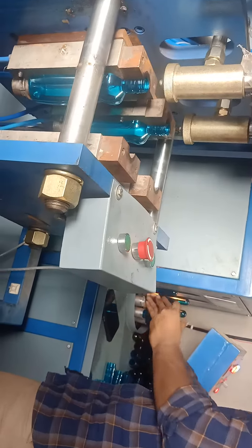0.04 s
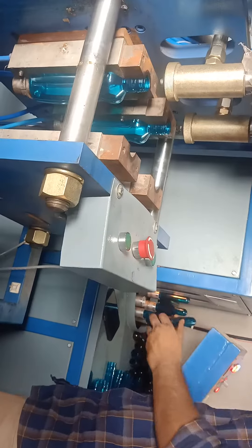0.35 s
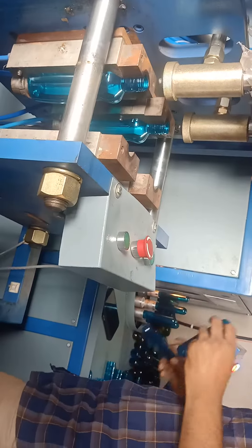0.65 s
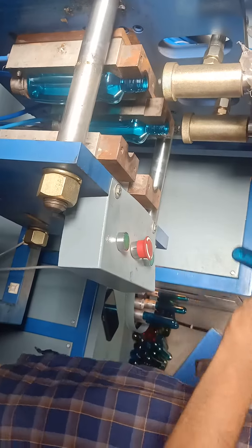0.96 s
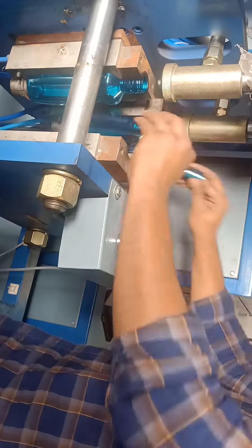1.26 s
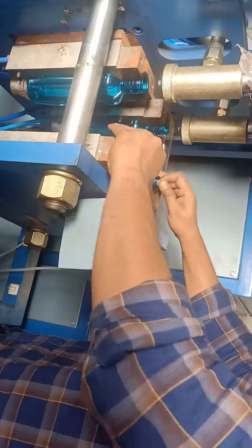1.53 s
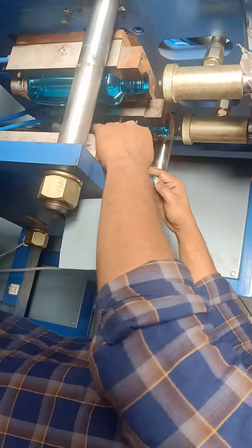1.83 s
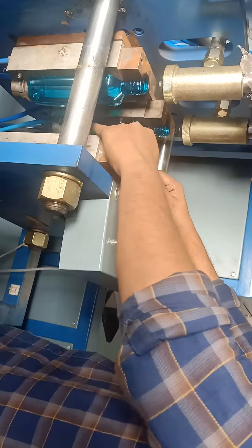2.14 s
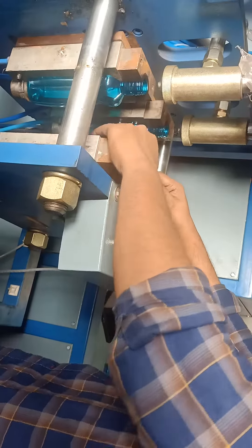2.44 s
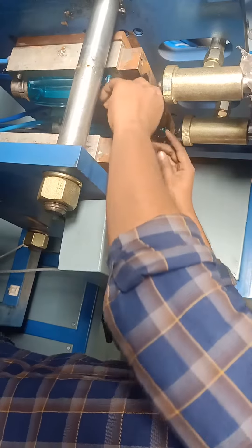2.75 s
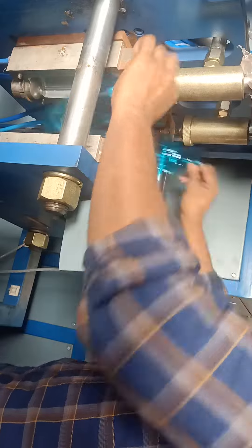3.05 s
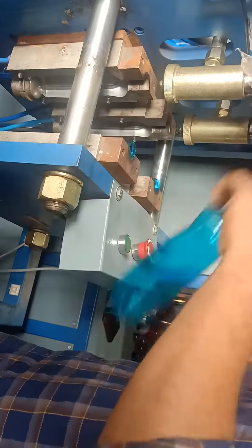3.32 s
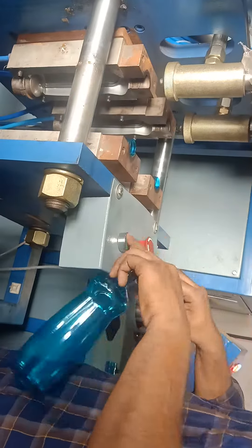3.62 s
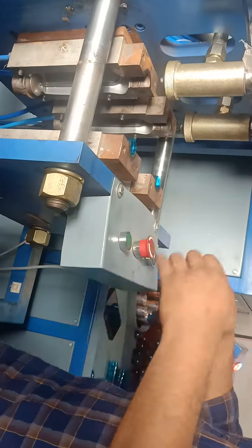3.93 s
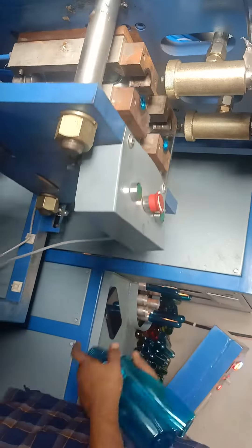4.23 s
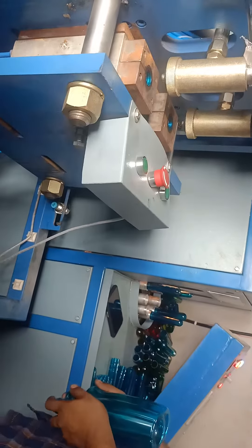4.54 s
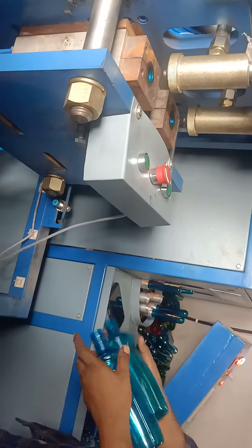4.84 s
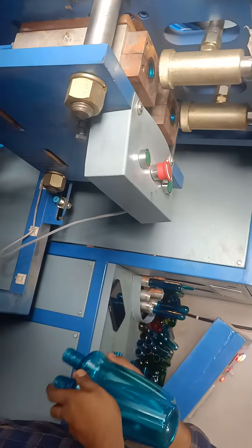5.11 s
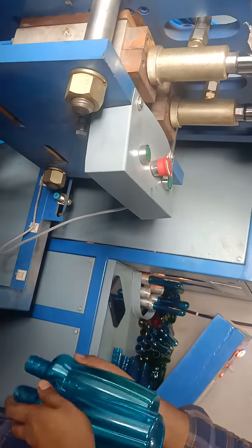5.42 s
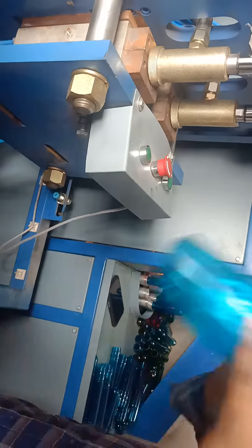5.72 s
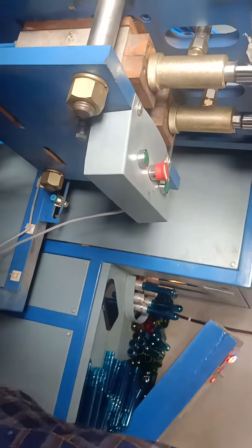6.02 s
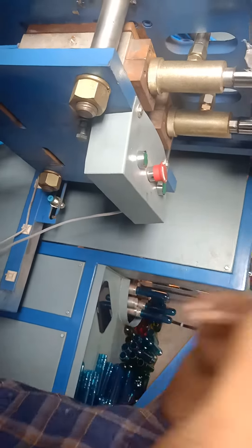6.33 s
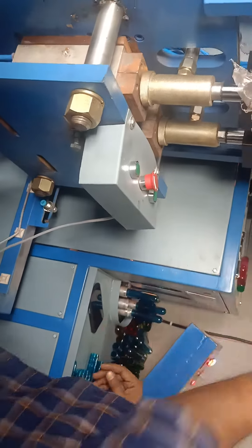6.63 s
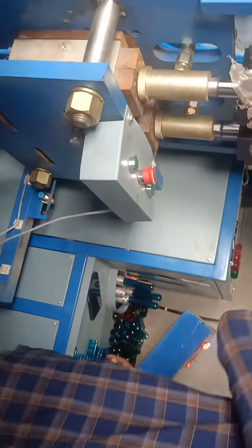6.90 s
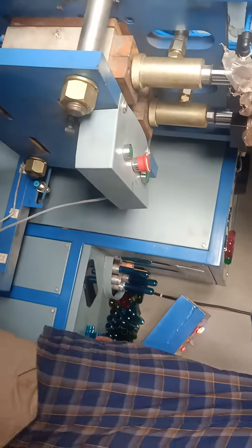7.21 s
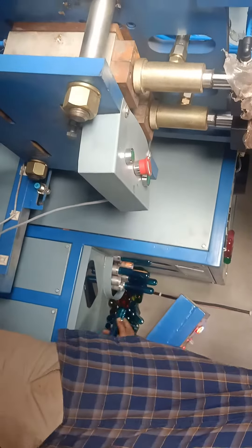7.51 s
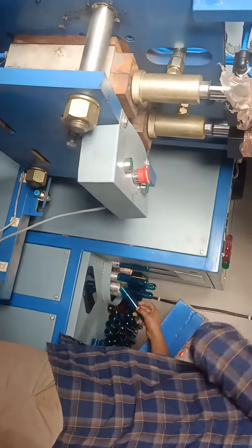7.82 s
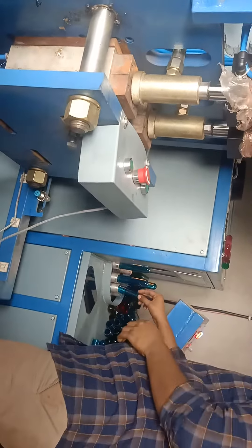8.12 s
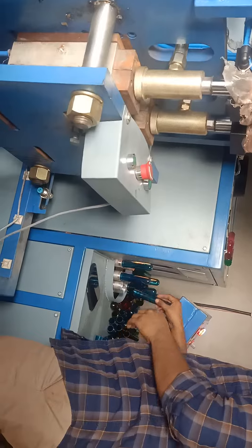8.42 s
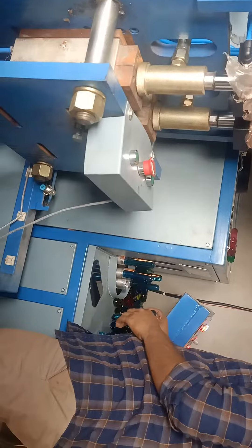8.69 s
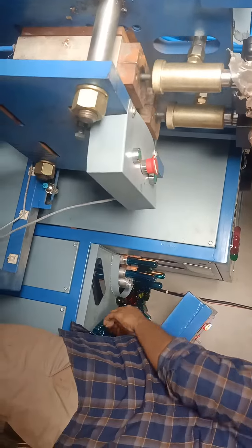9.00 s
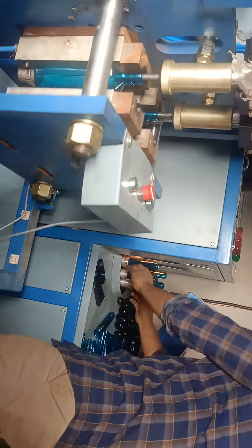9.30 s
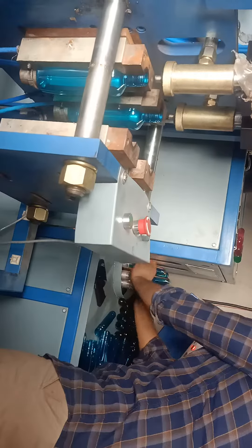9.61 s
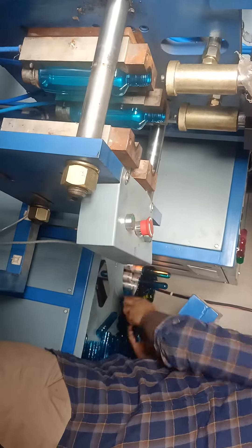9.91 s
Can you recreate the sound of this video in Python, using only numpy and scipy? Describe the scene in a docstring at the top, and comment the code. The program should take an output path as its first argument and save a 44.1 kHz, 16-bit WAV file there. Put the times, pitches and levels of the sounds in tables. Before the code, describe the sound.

Over droning, whining motors, a bottle moulding machine lets out two sharp air blasts, with hissing vents and metal clunks.

```python
"""A small workshop, just above the mould of a pneumatic bottle blow-moulding machine running one cycle.
Motors drone and whine as a bed. Valves dump compressed air through a ringing silencer, with a shriek,
a cabinet boom and gusts on the microphone. Cylinders vent as the mould travels, seals spit, and steel
parts clunk home. An automatic gain ducks under the bright hisses and creeps back up."""
import sys
import numpy as np
from scipy import signal
from scipy.fft import rfft, irfft
from scipy.io import wavfile
from scipy.ndimage import uniform_filter1d

SR = 44100
rng = np.random.default_rng(int(sys.argv[2]) if len(sys.argv) > 2 else 0)


def dump_mix(stems):
    """Bounce the given channels to the path in sys.argv[1] as a 16-bit WAV at rate SR."""
    frames = np.atleast_2d(stems).T  # one column per channel
    limited = np.clip(frames, -1, 1)  # hard clip at full scale
    pcm = np.round(limited * 32767).astype(np.int16)
    wavfile.write(sys.argv[1], SR, pcm)


N = 438794
T = np.arange(N) / SR
F = np.maximum(np.fft.rfftfreq(N, 1 / SR), 1)

# Each EQ shapes a noise; its levels are relative. Sag is the fall in level while a valve stays open.
# workshop drone (f/Hz, level/dB)
DRONE_EQ = [(25, -26), (55, -27), (80, -13), (112, -7.5), (160, -7), (260, -5.5), (420, 0.5), (750, -2),
            (1100, -4.5), (2080, -5.5), (3280, -11), (5170, -12.5), (8800, -38), (13500, -36.5),
            (15500, -44)]
# broad resonances and dips in the drone (f/Hz, width/Hz, gain/dB)
DRONE_RINGS = [(1500, 82, -5), (1825, 41, 1), (2100, 91, 5.5), (2360, 430, 4.5), (3280, 210, -8.5),
               (4220, 170, 4), (5400, 180, 6), (5440, 720, -6)]
# motor hum (multiple of the motor's speed, level/dB)
MOTOR_HARMONICS = [(2, -56), (3, -50), (4, -56.5), (5, -50.5), (7, -52.5), (10, -53)]
# steady tones of fans and pumps (f/Hz, level/dB)
FAN_TONES = [(117, -53), (433, -47.5), (1695, -55), (1838, -48), (1900, -53), (2047, -47), (2335, -73),
             (2472, -50.5), (4258, -64), (5066, -63)]
# whining motors (f/Hz, level/dB, load on/s, load off/s, load boost/dB, left-right phase/rad)
MOTOR_WHINES = [(1208, -45, 1.67, 4.3, 6, -2), (2060, -54, 1.73, 3.8, 9, 0.71),
                (1343, -51, 4.6, 12, 8, -1.7)]
# fine spray of air past the seals (f/Hz, level/dB)
SPRAY_EQ = [(200, -60), (3000, -7), (5000, 21.5), (7500, 9.5), (9500, -2.5), (12000, 10), (14000, 2),
            (15500, -10)]
# seal spits (t/s, level/dB, attack/s, t60/s)
SEAL_SPITS = [(2.325, -44, 0.0087, .15), (4.115, -46, 0.0077, .25), (4.485, -27, 0.004, 0.29),
              (4.553, -24.5, .003, 0.39), (4.62, -32, .012, 0.5), (4.77, -37, 0.021, 0.18),
              (6.025, -31.5, 0.06, 0.22), (9.607, -27.5, 0.008, 0.83), (9.743, -33, 0.007, .35),
              (9.815, -34, 0.009, 0.26)]
# leak while the bottles are under pressure (t/s, level/dB, attack/s, hold/s, sag/(dB/s), t60/s)
SEAL_LEAK = [(6.0, -52.5, 0.69, 1.8, 0.5, .1)]
# rattling body of the steel frame (f/Hz, level/dB)
FRAME_EQ = [(25, -40), (70, -14), (130, -5.5), (260, 4.5), (500, 5.5), (1000, -3), (1450, -4), (2200, 2.5),
            (3300, -9), (5000, -7.5), (7500, -20), (14000, -36)]
# broad clang of the mould plates (f/Hz, width/Hz, gain/dB)
PLATE_CLANG = [(2560, 330, 10.5), (920, 150, 9), (344, 100, 0)]
# ringing modes of the frame (f/Hz, relative level/dB, t60/s)
STEEL_MODES = [(187, -30, 0.25), (327, -10, 0.16), (475, -8, .25), (804, -24, 0.11), (926, -1, 0.41),
               (1110, -19, 0.14), (1360, -9, .09), (2160, -6, .35), (2170, -16, .2), (2636, 12, 0.35),
               (2900, -11, .35)]
# hits on the frame (t/s, level/dB, attack/s, t60/s, low-pass/Hz)
FRAME_HITS = [(3.025, -28.5, 0.0043, 0.17, 8000), (3.107, -26, 0.0067, 0.04, 5000),
              (4.426, -13, 0.0036, 0.12, 3000), (4.449, -17.5, 0.0088, 0.83, 400),
              (4.57, -31, 0.016, 0.57, 400), (6.533, -18.5, 0.0046, 0.41, 2370),
              (9.523, -12, 0.007, 0.29, 4020), (9.579, -26.5, 0.011, 0.92, 1000),
              (9.745, -33.5, .005, 1, 1180)]
# dump valve's port (f/Hz, level/dB)
DUMP_EQ = [(25, -50), (70, -12), (200, -7.5), (600, -7), (1400, -4.5), (1900, -3.5), (2550, -3),
           (3300, -4.5), (4200, -8), (5800, -6), (7500, -24), (10000, -28), (13500, -27), (15500, -43)]
# silencer that dumps and cylinder vents both blow through (f/Hz, width/Hz, gain/dB)
SILENCER_RINGS = [(2470, 410, 5.5), (1660, 19, -7), (2060, 17, 6.5), (2294, 20, 9.5), (2680, 30, 0),
                  (2880, 37, 6), (3930, 65, 8.5), (4180, 60, 4.5), (6000, 37, 9)]
# valve dumps (t/s, level/dB, attack/s, shriek level/dB)
VALVE_DUMPS = [(3.795, 4.5, 0.028, -1), (8.082, -4, 0.0072, 1.5)]
# thin air jet (f/Hz, level/dB)
JET_EQ = [(60, -60), (900, -7.5), (1900, -2), (2600, 7.5), (3400, -1), (5100, 4), (6300, -2), (8000, -13),
          (10500, -14.5), (14000, -14.5), (15500, -9.5)]
# valves letting out a jet (t/s, level/dB, attack/s, hold/s, sag/(dB/s), t60/s)
JET_CUES = [(5.048, -18, 0.043, 0.62, 11, 1.86), (8.008, -29.5, 0.0092, 0.042, 0, 0.58),
            (8.72, -29, .015, 1, 8, .8), (8.76, -17, 0.078, 0.21, 26, 0.64),
            (8.85, -13.5, 0.073, 0.013, 0, 0.56)]
# cabinet boom (f/Hz, level/dB)
CABINET_EQ = [(25, -32), (55, -24), (90, 7), (115, -8.5), (150, 6.5), (260, -16), (600, -17.5), (3000, -56)]
# thuds of pressure through the cabinet (t/s, level/dB, attack/s, t60/s)
CABINET_THUDS = [(3.802, -10, 0.0085, 0.29), (5.308, -29.5, 0.013, 0.29), (8.09, -20, 0.027, 0.22),
                 (8.88, -39, 0.027, 0.18), (9.525, -34, 0.009, .5)]
# rumble of exhaust air on the microphone (f/Hz, level/dB)
GUST_EQ = [(25, -38), (55, -11), (100, 3.5), (190, 5), (350, 3), (700, -2.5), (1500, -11.5), (4000, -25),
           (12000, -60)]
# gusts of that air (t/s, level/dB)
GUST_CUES = [(3.803, 1), (3.824, 0), (3.844, -14), (8.086, -12), (8.103, -1.5), (8.118, -7), (8.155, -10),
             (8.902, -8.5), (8.918, -11.5), (8.938, -14.5), (8.949, -11.5)]
# cylinder vents (f/Hz, level/dB)
VENT_EQ = [(25, -60), (150, -17), (600, -6.5), (1400, -7), (2000, -4), (2550, 1), (3300, -3), (4200, -5),
           (5700, -6.5), (7500, -25), (10000, -29), (13000, -28), (15500, -41)]
# piston strokes (t/s, level/dB, attack/s, travel/s, sag/(dB/s))
PISTON_STROKES = [(3.92, -11.5, 0.15, 0.56, 15.5), (4.72, -31.5, 0.095, 0.094, 10),
                  (8.75, -20.5, 0.026, 0.35, 10), (8.85, -15.5, 0.055, 0.12, 18),
                  (9.198, -30, 0.14, 0.56, -3), (9.59, -33, 0.019, .03, 19.5),
                  (9.742, -35, 0.014, 0.11, 12)]
# stereo tilt of the microphone pair (f/Hz, left minus right/dB)
MIC_BALANCE = [(60, 0), (110, -1), (200, 0), (380, 0.5), (700, -3), (1280, 2), (2370, -7), (4370, -2),
               (8070, 0.5), (14900, -7)]


def undb(db):
    """Decibels to gain."""
    return 10 ** (np.asarray(db) / 20)


def eq_curve(points):
    """Join EQ points on a log-frequency axis, in dB."""
    hz, db = np.transpose(points)
    return np.interp(np.log(F), np.log(hz), db)


def wander(rate_hz):
    """Smooth random modulation with a spread near 1."""
    knots = rng.standard_normal(4096)
    return 1.297 * np.interp(T * rate_hz, np.arange(len(knots)), knots)


def flow(start, db, attack, hold, sag_db_per_s, t60):
    """Valve envelope: it opens, sags with the pressure while held, then drains away."""
    age = np.maximum(T - start - attack, 0)
    fall_db = sag_db_per_s * np.minimum(age, hold) + 60 * np.maximum(age - hold, 0) / t60
    return np.clip((T - start) / attack, 0, 1) * undb(db - fall_db)


def flows(cues):
    """Envelope of several openings feeding one outlet."""
    return sum(flow(*cue) for cue in cues)


def bursts(cues):
    """Envelope of openings with no hold: pressure builds and drains away at once."""
    return sum(flow(start, db, attack, 0, 0, t60) for start, db, attack, t60 in cues)


def air(eq, rings=(), lag_ms=0, plates=0.5, diffuse=0.5):
    """Coloured stereo turbulence at rms 1: direct, scattered off steel plates, and diffuse from the room."""
    t = T[:2048]
    scatter = rng.standard_normal((2, len(t))) * np.exp(-t / 0.046) * (t > 0.001)
    scatter = rfft(scatter / np.sqrt(np.sum(scatter ** 2, axis=1, keepdims=True)), N)
    direct = np.exp(-1j * np.pi * F * lag_ms / 1000 * np.array([[1], [-1]]))
    spread = (F + 60) / (F + 400)  # long waves reach both sides alike
    source, *room = rfft(rng.standard_normal((3, N)))
    field = source * (direct + plates * spread * scatter) + diffuse * spread * np.array(room)
    rings_db = sum(db / (1 + (2 * (F - hz) / width) ** 2) for hz, width, db in rings)
    noise = irfft(undb(eq_curve(eq) + rings_db) * field, N)
    return noise / np.sqrt(np.mean(noise ** 2))


def motor_tone(hz, stereo_rad, drift_hz, flutter_db):
    """A motor tone that drifts in pitch and flutters in level on each side."""
    phase = 2 * np.pi * np.cumsum(hz + drift_hz * wander(12)) / SR
    sides = [np.sin(phase + shift) * undb(flutter_db * wander(9.8)) for shift in (stereo_rad, 0)]
    return np.sqrt(2) * np.array(sides)


def workshop_bed(motor_hz=66.6):
    """Motors and fans: a restless drone, a many-toned hum, and whines that swell under load."""
    bed = air(DRONE_EQ, DRONE_RINGS, lag_ms=0.345, plates=0.9, diffuse=0.76)
    bed *= undb(-32 + 0.11 * wander(16))
    for hz, db in [(order * motor_hz, db) for order, db in MOTOR_HARMONICS] + FAN_TONES:
        bed += undb(db) * motor_tone(hz, min(hz / 1500, 0.8), drift_hz=1 + hz / 600, flutter_db=0.5)
    for hz, db, start, end, boost_db, stereo_rad in MOTOR_WHINES:
        load = np.clip(np.minimum(T - start, end - T) / 0.032, 0, 1)
        whine = motor_tone(hz, stereo_rad, drift_hz=1.51, flutter_db=2)
        bed += undb(db + boost_db * load) * whine * undb([[-3], [3]])  # panned right
    return bed


def seal_spray():
    """Air squeezes past the seals in fizzy spits and one long, faint leak."""
    spray = air(SPRAY_EQ, plates=1, diffuse=0.21)
    return spray * (bursts(SEAL_SPITS) + flows(SEAL_LEAK)) * undb(0.99 * wander(86))


def frame_clunks(room_t60=3.54):
    """Hits on the steel frame: a dense rattle, ringing modes and a room tail, duller for soft contacts."""
    rattle = air(FRAME_EQ, PLATE_CLANG, plates=0.2, diffuse=0.76) * undb(wander(220))
    clunks = np.zeros((2, N))
    for at, db, attack, t60, lowpass_hz in FRAME_HITS:
        start = int(at * SR)
        t = T[:min(SR, N - start)]
        span = slice(start, start + len(t))
        ring = sum(undb(mode_db - 60 * t / mode_t60) * np.sin(2 * np.pi * (hz * t + rng.random((2, 1))))
                   for hz, mode_db, mode_t60 in STEEL_MODES)
        decay = undb(-60 * np.maximum(t - attack, 0) / t60)
        tail = undb(-16 - 60 * t / room_t60)
        hit = (rattle[:, span] * (decay + tail) + undb(-24) * ring) * np.minimum(t / attack, 1)
        lowpass = signal.butter(1, lowpass_hz, fs=SR, output="sos")
        clunks[:, span] += undb(db) * signal.sosfilt(lowpass, hit)
    return clunks


def valve_dumps(t60=0.89):
    """Compressed air escapes in a sudden, sputtering blast that rings the silencer."""
    pressure = bursts((at, db, attack, t60) for at, db, attack, _ in VALVE_DUMPS)
    blast = air(DUMP_EQ, SILENCER_RINGS, lag_ms=-0.436, plates=1, diffuse=1)
    return blast * pressure * undb(0.14 * wander(170))


def valve_jets(shriek_attack_s=0.027, shriek_t60=0.44):
    """Thin jets hiss through narrow valves and shriek as a dump valve cracks open."""
    shrieks = bursts((at, db, shriek_attack_s, shriek_t60) for at, _, _, db in VALVE_DUMPS)
    jet = air(JET_EQ, lag_ms=-0.425, plates=1, diffuse=1.75)
    return jet * (flows(JET_CUES) + shrieks) * undb(0.5 * wander(33))


def cabinet_boom():
    """Pressure thuds through the machine's cabinet and gives the low end its weight."""
    return air(CABINET_EQ, plates=0.37, diffuse=0.9) * bursts(CABINET_THUDS)


def exhaust_gusts(attack_s=0.0021, t60=0.063):
    """Expelled air buffets the microphone in short, ragged slaps."""
    slaps = bursts((at, db, attack_s, t60) for at, db in GUST_CUES)
    return air(GUST_EQ, plates=0.23, diffuse=2.4) * slaps * undb(0.49 * wander(110))


def cylinder_vents(t60=0.62):
    """Travelling pistons push sputtering air through the silencer; it dies away once they stop."""
    vent = air(VENT_EQ, SILENCER_RINGS, lag_ms=-0.442, plates=1, diffuse=1)
    strokes = sum(flow(*stroke, t60) for stroke in PISTON_STROKES)
    return vent * strokes * undb(0.71 * wander(45)) * undb([[-1], [0.5]])  # panned slightly right


def scene():
    """The machine's cycle over the workshop bed."""
    return (workshop_bed() + seal_spray() + frame_clunks() + valve_dumps() + valve_jets()
            + cabinet_boom() + exhaust_gusts() + cylinder_vents())


def auto_gain(x, threshold_db=-41, slope=0.9, depth_db=13, release_db_per_s=3, start_cut_db=14):
    """Strong treble ducks the whole mix at once; the gain climbs back at a steady rate."""
    sidechain = signal.sosfilt(signal.butter(4, 8000, "high", fs=SR, output="sos"), x)
    power = uniform_filter1d(np.mean(sidechain ** 2, axis=0), size=600)
    treble_db = 10 * np.log10(np.abs(power) + 1e-12)
    cut_db = np.clip(slope * (treble_db - threshold_db), 0, depth_db)
    cut_db[0] = start_cut_db  # opens ducked, so the bed swells in
    release_db = release_db_per_s * T
    held_db = np.maximum.accumulate(cut_db + release_db) - release_db
    return x * undb(-uniform_filter1d(held_db, size=200))


def record(dry):
    """Microphone chain: stereo tilt, low cut, automatic gain, hard clip and high cut."""
    tilt = undb(eq_curve(MIC_BALANCE) * np.array([[1], [-1]]) / 2)
    low_cut = signal.butter(3, 62, "high", fs=SR, output="sos")
    high_cut = signal.ellip(10, 0.2, 80, 15500, fs=SR, output="sos")
    mics = signal.sosfilt(low_cut, irfft(rfft(dry) * tilt, N))
    return signal.sosfilt(high_cut, np.clip(auto_gain(mics), -1, 1))


dry = scene()
out = record(dry)
dump_mix(out)
```